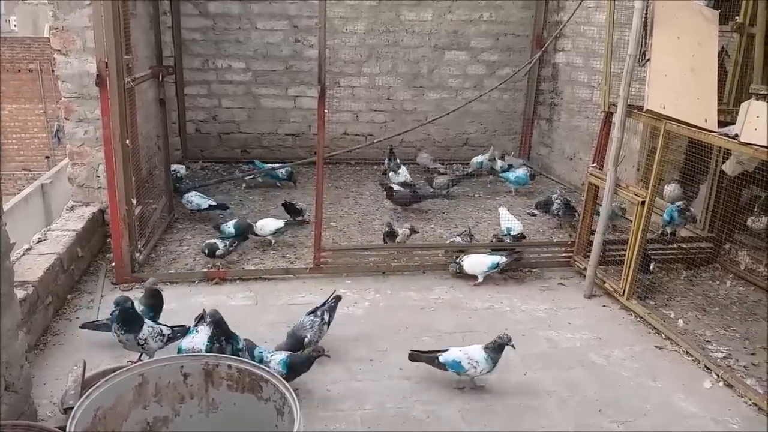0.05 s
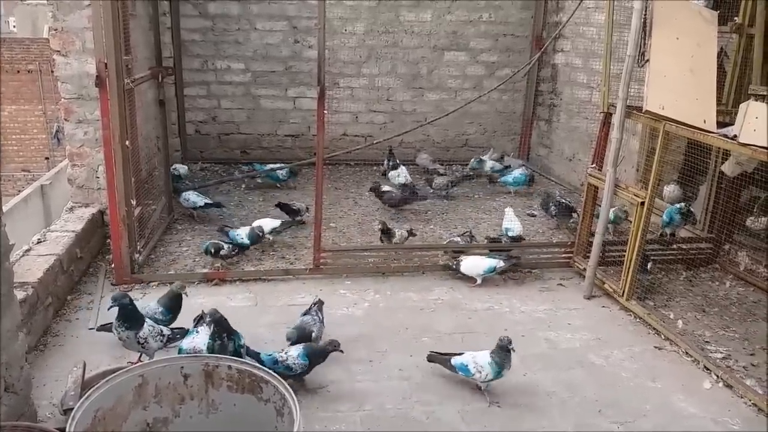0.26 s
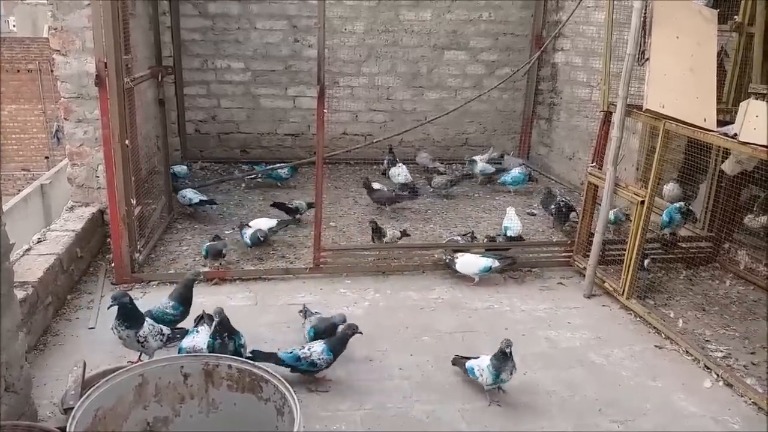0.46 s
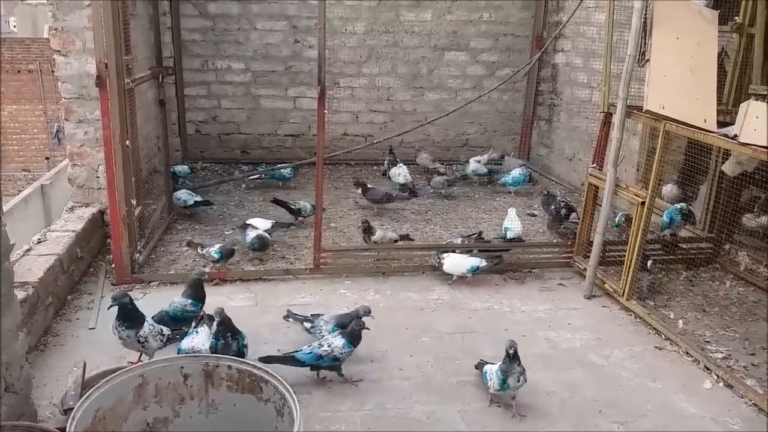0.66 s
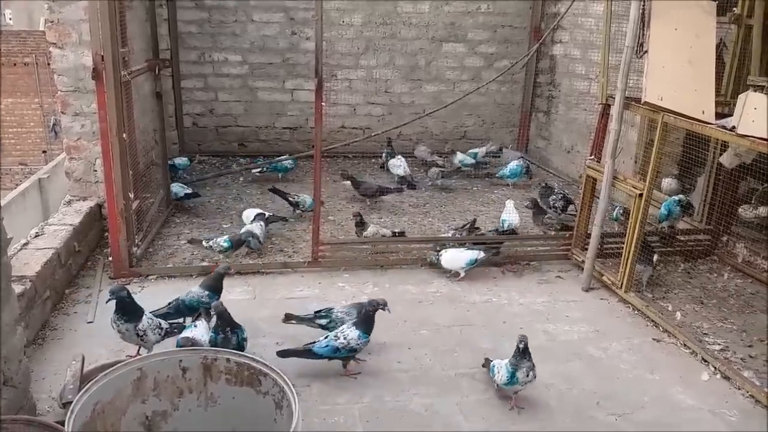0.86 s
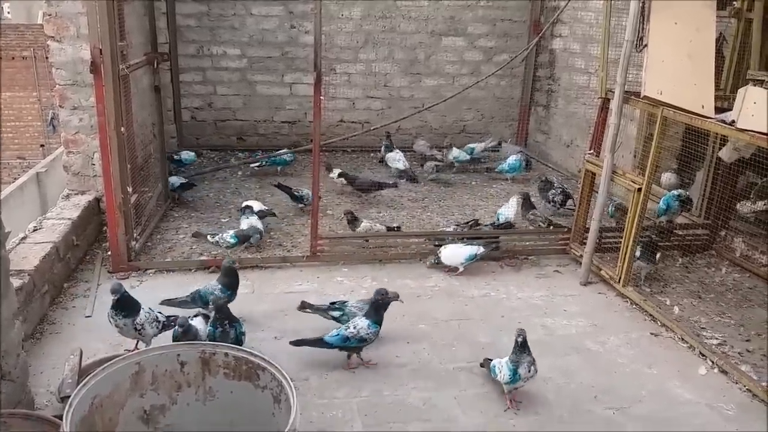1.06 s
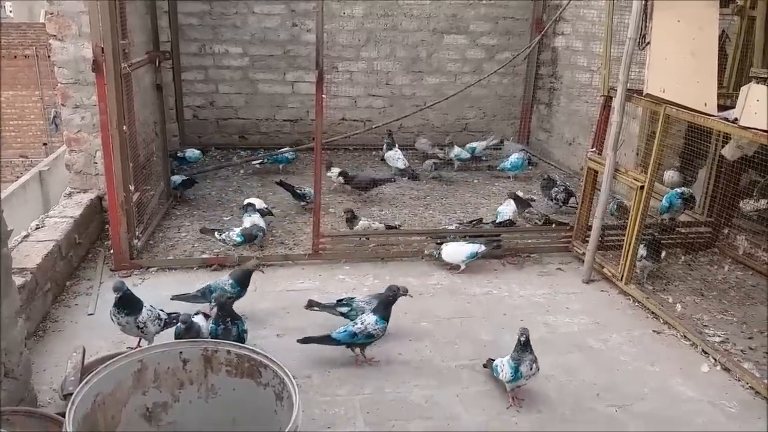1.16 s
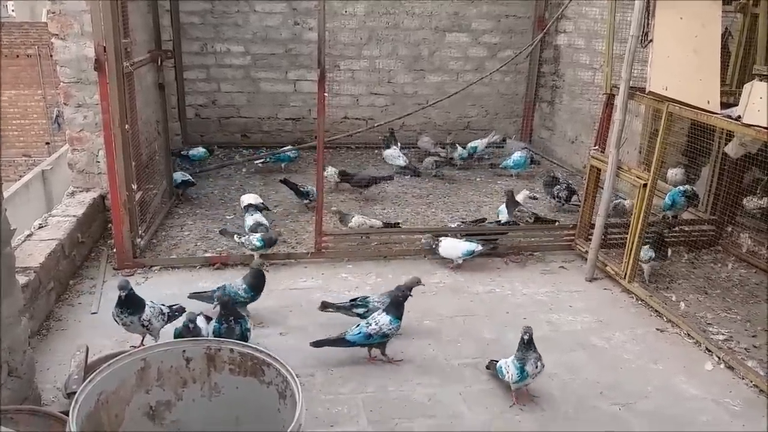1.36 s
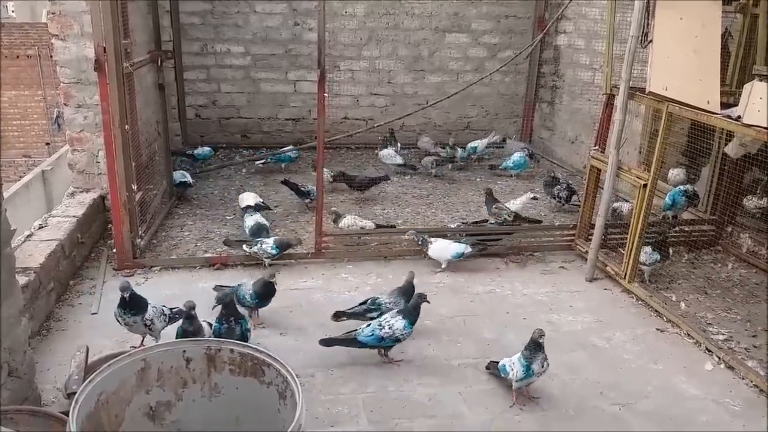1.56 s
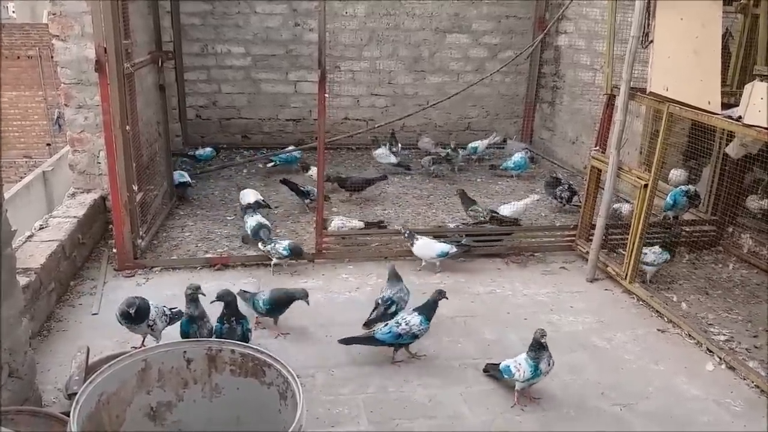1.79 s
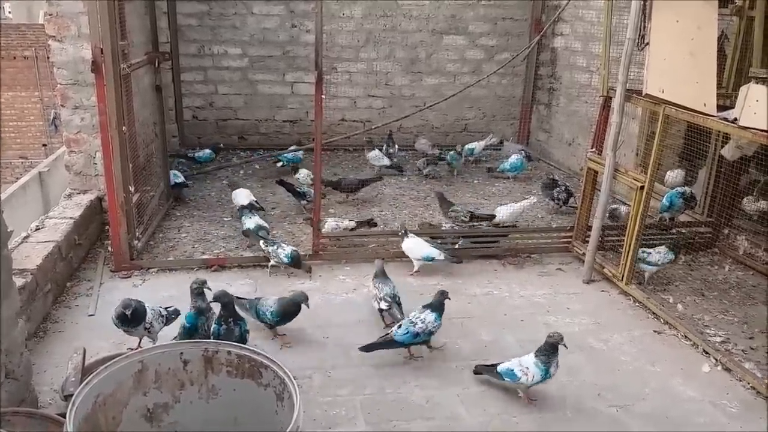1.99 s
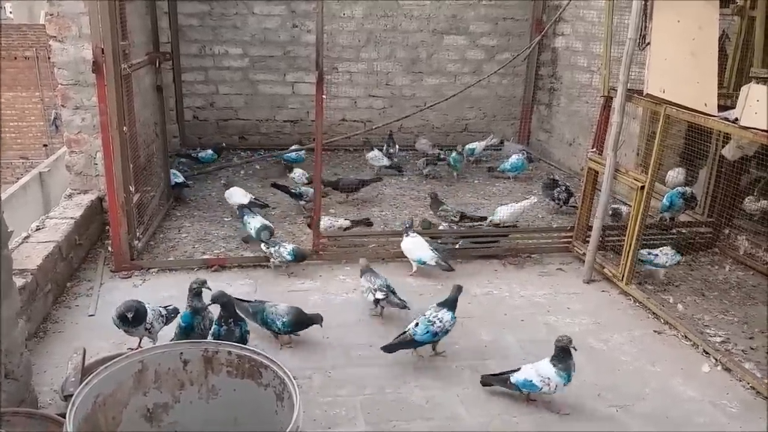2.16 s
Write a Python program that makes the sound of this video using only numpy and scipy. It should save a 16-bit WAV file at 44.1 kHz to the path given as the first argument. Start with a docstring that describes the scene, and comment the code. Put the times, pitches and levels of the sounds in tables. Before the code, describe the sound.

Pigeons coo in low, throaty calls over faint scuffling and a distant town rumble.

```python
"""Pigeons coo in turn on a walled rooftop beside their loft. Each coo is a low, almost pure tone that
breaks into a fast throaty flutter. Feathers and feet brush the concrete, and young birds squeak and
peep. Far off, a motor hums in the soft rumble of the town. The brick walls add a short ring."""
import sys
import numpy as np
from scipy import signal
from scipy.fft import rfft, irfft
from scipy.io import wavfile

SR = 44100
rng = np.random.default_rng(int(sys.argv[2]) if len(sys.argv) > 2 else 0)


def materialize(psi):
    """Save the field psi as 16-bit PCM at rate SR to the path in sys.argv[1].

    A 1-D psi becomes a single channel; in a 2-D psi each row is a channel.
    """
    bounded = np.clip(np.atleast_2d(psi).T, -1, 1)
    quanta = np.round(bounded * 32767).astype(np.int16)
    wavfile.write(sys.argv[1], SR, quanta)


N = 98387
T = np.arange(N) / SR


def undb(db):
    """Turn decibels into a gain."""
    return 10 ** (np.asarray(db) / 20)


def unit(x):
    """Scale to an average (rms) size of 1."""
    return x / np.sqrt(np.mean(x ** 2))


def wander(rate):
    """A smooth random curve of size 1 that changes about rate times a second."""
    smoothing = np.exp(-(np.fft.rfftfreq(N, 1 / SR) / rate) ** 2)
    return unit(irfft(rfft(rng.standard_normal(N)) * smoothing, N))


def colour(x, points, tilt_db=0):
    """Filter by (frequency [Hz], level [dB]) points, tilted per octave, fading below the first."""
    hz, db = np.array(points, float).T
    f = np.fft.rfftfreq(N, 1 / SR) + 1
    gain = undb(np.interp(np.log(f), np.log(hz), db) + tilt_db * np.log2(f / hz[0]))
    bass_cut = np.minimum(f / hz[0], 1) ** 2
    return unit(irfft(rfft(x) * gain * bass_cut, N))


def phase_of(hz):
    """Phase in radians of a moving pitch."""
    return 2 * np.pi * np.cumsum(hz) / SR


def tone(hz, waver, rate):
    """A pure tone whose pitch wanders by the fraction waver."""
    return np.sin(phase_of(hz * (1 + waver * wander(rate))))


def notes(table, waver=0.05):
    """Short soft tones that swell and fade."""
    return np.sqrt(2) * sum(undb(db) * np.exp(-((T - peak) / fade) ** 2) * tone(hz, waver, hz / 10)
                            for peak, hz, fade, db in table)


def place(x, pan_db):
    """Share a sound between the ears; positive is to the left."""
    return x * undb(np.array([[pan_db], [-pan_db]]) / 2)


def walls(x, wet_db, ring_s=0.48, gap_s=0.0079):
    """Sound bounces between the brick walls and leaves a short ring."""
    t = T[:SR // 2]
    ring = rng.standard_normal((2, len(t))) * undb(-60 * t / ring_s) * (t > gap_s)
    ring /= np.sqrt(np.sum(ring ** 2, axis=1, keepdims=True))
    return x + undb(wet_db) * signal.fftconvolve(x.mean(0)[None], ring, axes=1)[:, :N]


def town():
    """Gently wavering town air: a rumble alike at both ears and a wide hiss."""
    # tone colour of the town (frequency [Hz], relative level [dB])
    spectrum = [(40, -15.5), (58, 5.5), (200, 2), (500, -10), (4000, -26.5), (8000, -36), (15500, -34)]
    middle, side = colour(rng.standard_normal((2, N)), spectrum)
    side = signal.sosfilt(signal.butter(1, 397, "high", fs=SR, output="sos"), side)
    level = undb(-49 + 0.5 * wander(8.9))
    return place(level * np.array([middle + side, middle - side]), pan_db=0.5)


def motor():
    """A far motor whose two low tones throb and swell, and a dull bump."""
    # swell of the hum (time [s], level [dB])
    swell = [(0, -53.5), (0.98, -49.5), (1.08, -43), (1.6, -49.5), (1.7, -63), (1.9, -44.5), (2.17, -65.5)]
    # tones in the hum (pitch [Hz], relative level [dB])
    tones = [(102.3, -1), (123.5, -6.5)]
    # dull bump (peak time [s], pitch [Hz], fade [s], level [dB])
    bumps = [(1.924, 60, 0.018, -43.5)]
    hum = np.sqrt(2) * sum(undb(db) * tone(hz, waver=0.016, rate=6) for hz, db in tones)
    level = undb(np.interp(T, *np.array(swell).T))
    return place(level * hum + notes(bumps), pan_db=3)


def coo(curve, flutter_hz, roughness, break_s):
    """A pure tone breaks into uneven pulses, and the other side of the bird's voice box joins in."""
    times, pitches, levels = np.array(curve, float).T
    hz, db = np.interp(T, times, pitches), np.interp(T, times, levels)
    outside_s = np.maximum(np.maximum(times[0] - T, T - times[-1]), 0)
    loudness = np.sqrt(2) * undb(db - 0.5) * np.exp(-(outside_s / 0.0029) ** 2)
    rough = roughness * (1 + np.tanh((T - break_s) / 0.0069)) / 2
    beat = phase_of(flutter_hz * (1 + 0.14 * wander(31)))
    beat -= np.interp(times[np.argmax(levels)], T, beat)  # a pulse falls on the strongest push
    depth = 0.6 * rough
    pulses = (1 + depth * np.cos(beat)) / np.sqrt(1 + depth ** 2 / 2)
    pulses *= undb(1.5 * rough * np.tanh(wander(70)))
    # each pulse lifts the pitch, then lets it sag
    bend = 0.1 * wander(54.2) + 0.085 * np.cos(beat) - 0.092 * np.sin(beat)
    phase = phase_of(hz * (1 + rough ** 2 * bend))
    second_voice = undb(-5.5) * tone(437.7, waver=0.05, rate=49.6)
    overtone = undb(-13) * np.sin(2 * phase)
    voice = np.sin(phase) + rough * (second_voice + overtone)
    # the swollen throat pouch muffles the overtone
    pouch = signal.butter(5, [210, 582], "band", fs=SR, output="sos")
    return signal.sosfiltfilt(pouch, loudness * pulses * voice)


def pigeons():
    """Coos, the dying end of a coo at the start and faint far hoots; their echo off a side wall reaches one ear
    first."""
    # the path of each coo (time [s], pitch [Hz], level [dB])
    falling = [(0.178, 486, -44.5), (0.208, 340, -31), (0.228, 264, -40.5), (0.28, 343.7, -35),
               (0.32, 273, -49)]
    rolling = [(0.345, 378.6, -44.5), (0.435, 347, -50.5), (0.49, 345.1, -41.5), (0.535, 367.3, -40),
               (0.6, 356.8, -38.5), (0.66, 325, -53)]
    deep = [(0.37, 224.6, -47.5), (0.45, 251, -43), (0.5, 255, -54)]
    upper = [(0.36, 441.7, -43), (0.405, 462.6, -39), (0.435, 454.5, -51), (0.465, 466.5, -41),
             (0.55, 409.2, -52.5), (0.66, 530, -52), (0.75, 483, -52.5)]
    trailing = [(0.71, 380, -44.5), (0.73, 363.4, -39), (0.79, 337.5, -53.5), (0.9, 322.8, -45.5),
                (1.02, 340, -69)]
    short = [(1.031, 347.2, -50), (1.039, 323, -28.5), (1.058, 351, -38), (1.115, 333.4, -45)]
    short_loud = [(1.142, 347.6, -68), (1.151, 355, -25.5), (1.165, 363.4, -37), (1.202, 333.6, -36),
                  (1.225, 368, -48.5)]
    purring = [(1.35, 330, -51), (1.389, 348, -48.5), (1.398, 354, -29.5), (1.425, 361.7, -41.5),
               (1.45, 343.8, -32.5), (1.58, 317.3, -42), (1.67, 215, -47)]
    answer = [(1.585, 339, -55.5), (1.648, 460.4, -41.5), (1.672, 361, -47), (1.72, 335, -54)]
    long = [(1.78, 479.5, -62), (1.82, 453.2, -35), (1.852, 410, -27.5), (1.872, 385.7, -29.5),
            (1.892, 288.7, -34), (2.035, 295.2, -33), (2.176, 274.5, -35)]
    # short soft notes: the dying end of a coo as the sound begins, then two faint far hoots (peak time [s],
    # pitch [Hz], fade [s], level [dB])
    soft_notes = [(0.02, 421, 0.018, -45.5), (0.465, 653.3, 0.03, -51), (0.8, 675, 0.025, -53.5)]
    voices = (coo(falling, flutter_hz=62, roughness=0.8, break_s=0.235)
              + coo(rolling, 74, 0.85, 0.3)
              + coo(deep, 55, 0.15, 0.3)
              + coo(upper, 53, 0.45, 0.3)
              + coo(trailing, 72, 0.7, 0.71)
              + coo(short, 54, 0.45, 1.045)
              + coo(short_loud, 50, 0.2, 1.16)
              + coo(purring, 43.5, 0.75, 1.3)
              + coo(answer, 70, 0.55, 1.58)
              + coo(long, 70, 0.72, 1.846)
              + notes(soft_notes))
    echo = np.array([np.interp(T - lag_s, T, voices, left=0) for lag_s in (0.0159, 0.01648)])
    return walls(place(voices + undb(-11) * echo, pan_db=3), wet_db=-10)


def young_birds():
    """Hoarse sliding squeaks shaped by the beak, and thin far peeps."""
    # squeaks (start [s], length [s], start pitch [Hz], end pitch [Hz], level before the beak [dB])
    squeaks = [(0.382, 0.1, 1964, 1408, -60), (0.558, 0.06, 2240, 1863, -52.5),
               (0.611, .034, 1685, 1546, -52.5), (1.219, 0.067, 1548, 1606, -54.5)]
    # peeps (peak time [s], pitch [Hz], level [dB])
    peeps = [(1.185, 4900, -68), (1.755, 4880, -73), (1.821, 4910, -68), (2.002, 5380, -73),
             (2.088, 5210, -65), (2.15, 5810, -67.5)]
    rasp_hz, beak_hz, beak_db_per_octave = 207, 3200, -17
    out = notes([(peak, hz, 0.027, db) for peak, hz, db in peeps], waver=0.025)
    for start, length, from_hz, to_hz, db in squeaks:
        progress = np.clip((T - start) / length, 0, 1)
        hz = from_hz + (to_hz - from_hz) * progress
        for k in range(1, 5):  # the pitch and three overtones
            beak_db = beak_db_per_octave * np.abs(np.log2(k * hz / beak_hz))
            phase = phase_of(k * hz)
            rasp = wander(k * rasp_hz) * np.sin(phase) + wander(k * rasp_hz) * np.cos(phase)
            out += undb(db + beak_db) * np.sin(np.pi * progress) * rasp
    return walls(place(out, pan_db=-10.5), wet_db=-2.5)


def brushes():
    """Feathers and feet brush the concrete in swells of tiny scratches."""
    # strokes (peak time [s], fade [s], level [dB], treble tilt [dB per octave])
    strokes = [(0.418, 0.18, -59.5, 2.5), (0.557, 0.043, -51.5, 3), (0.634, 0.082, -55, 4.5),
               (0.867, 0.066, -46, 0.5), (1.101, 0.031, -50.5, 0.5), (1.281, 0.025, -42, 4),
               (1.456, 0.034, -41.5, 1), (1.561, 0.026, -55, -0.5)]
    # tone colour of a stroke (frequency [Hz], relative level [dB])
    spectrum = [(410, -9), (680, 2.5), (2000, -1), (5360, -7.5), (15500, -19.5)]
    scratches_per_s, rise_s = 1700, 0.016
    hz, colour_db = np.array(spectrum).T
    fine_hz = np.linspace(hz[0], hz[-1], 120)
    smooth_db = np.interp(np.log(fine_hz), np.log(hz), colour_db)
    out = 0
    for peak, fade, db, tilt in strokes:
        scratches = (rng.random((3, N)) < scratches_per_s / SR) * rng.standard_normal((3, N))
        scratches *= undb(4.5 * np.tanh(rng.standard_normal((3, N))))
        ears = scratches[:2] + 0.32 * scratches[2]  # some scratches reach both ears
        swell = np.exp(-(np.abs(T - peak) / np.where(T < peak, rise_s, fade)) ** 1.8)
        uneven_db = smooth_db + 2.5 * rng.standard_normal(len(fine_hz))  # each stroke rings its own way
        out += undb(db) * swell * colour(ears, np.c_[fine_hz, uneven_db], tilt)
    return walls(place(out, pan_db=-2), wet_db=-6.5)


def scene():
    """The birds on the rooftop, with the town behind them."""
    return pigeons() + brushes() + young_birds() + motor() + town()


def record(dry):
    """End the sound with a quick fade and cut the highest treble."""
    end_s, top_hz = 2.178, 15850
    fade = np.clip((end_s - T) / 0.004, 0, 1)
    return signal.sosfilt(signal.ellip(10, 0.2, 80, top_hz, fs=SR, output="sos"), dry * fade)


dry = scene()
out = record(dry)
materialize(out)
```